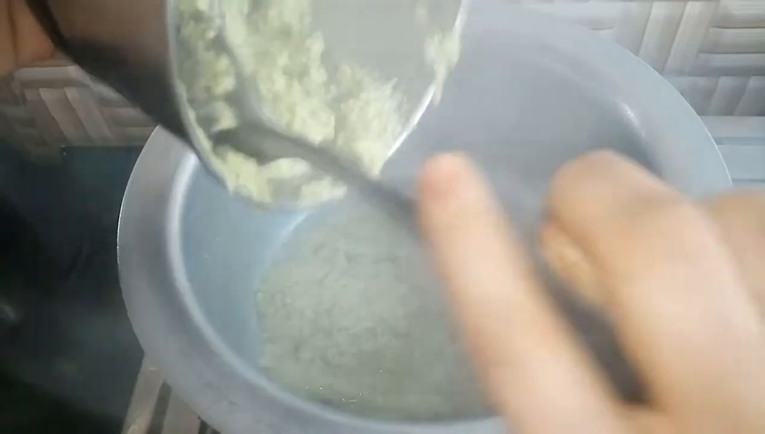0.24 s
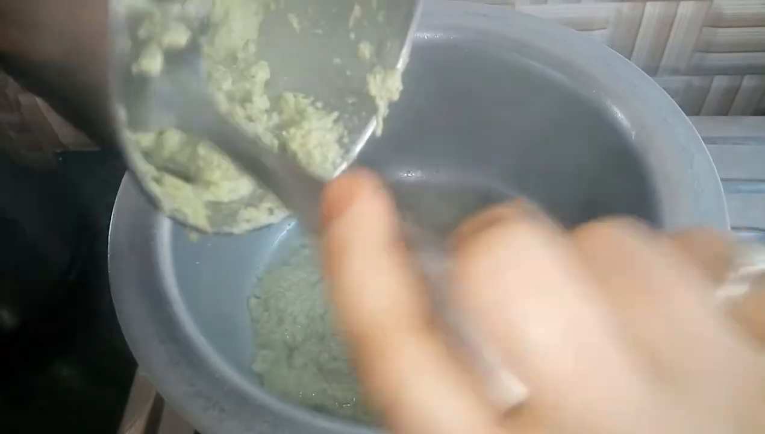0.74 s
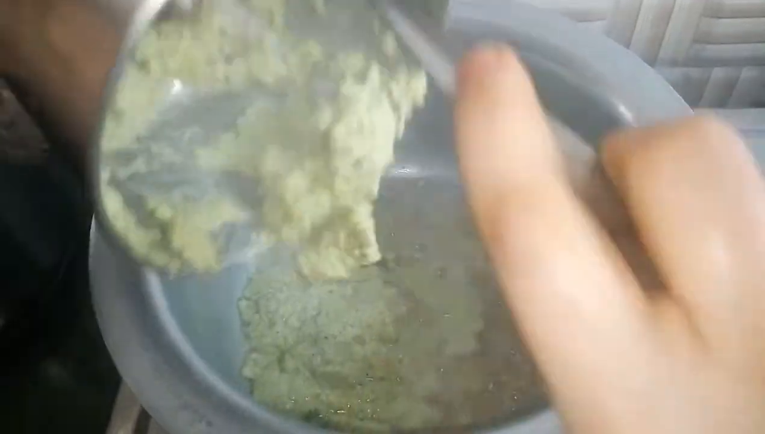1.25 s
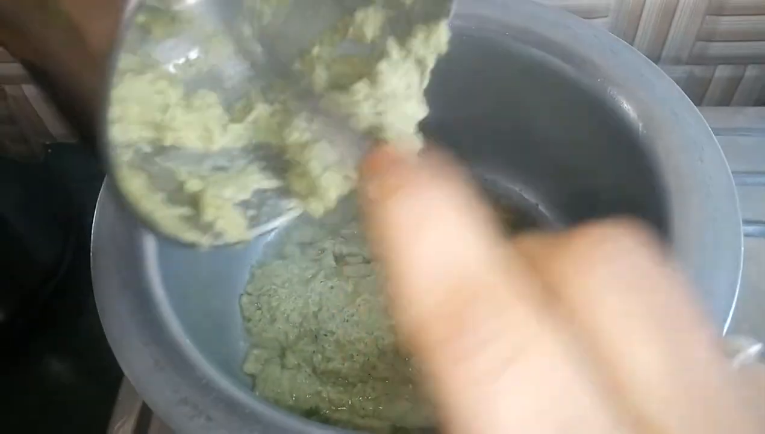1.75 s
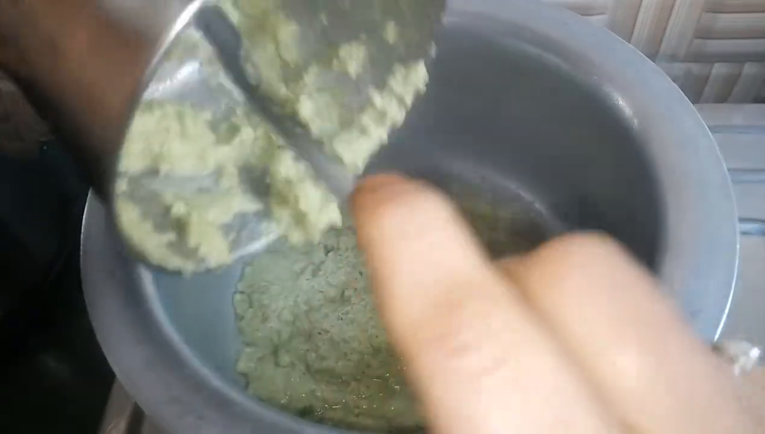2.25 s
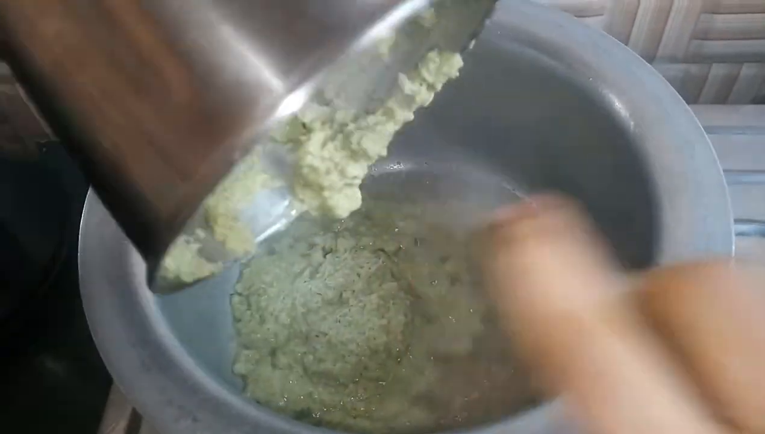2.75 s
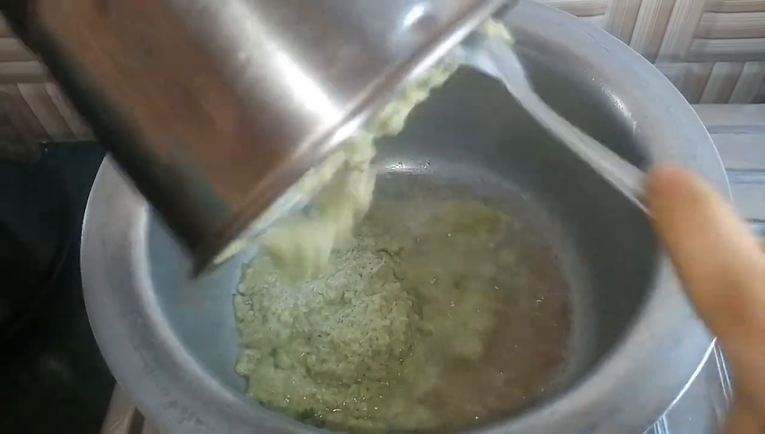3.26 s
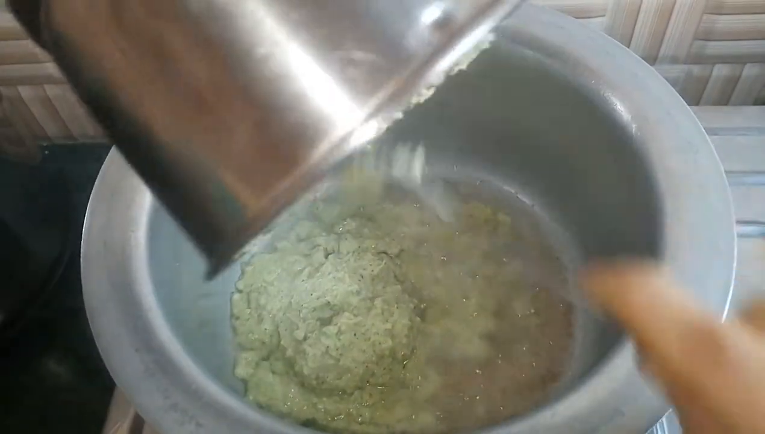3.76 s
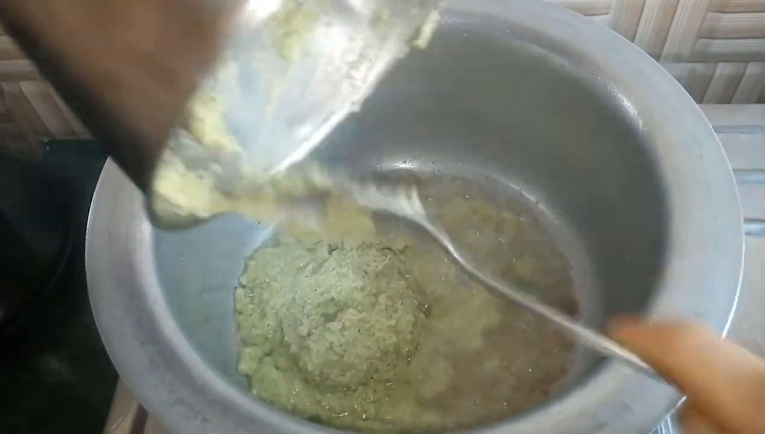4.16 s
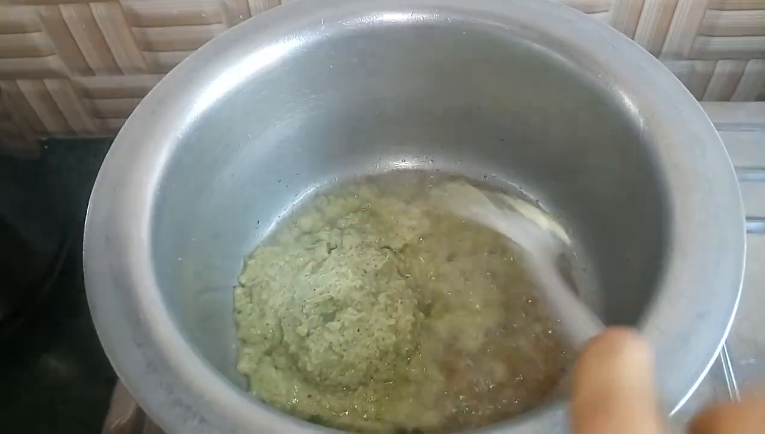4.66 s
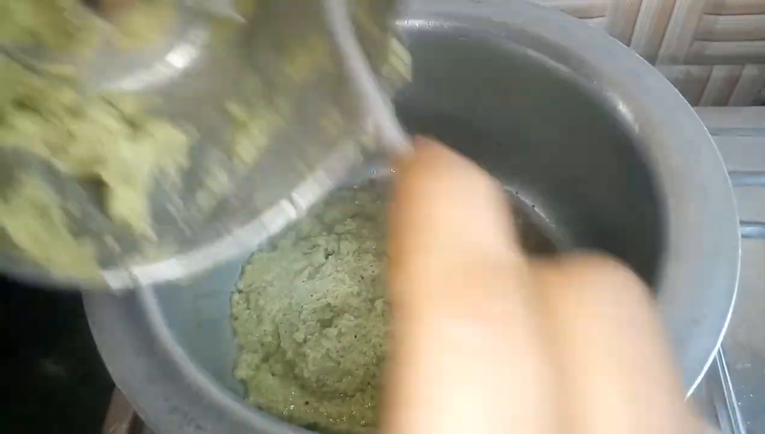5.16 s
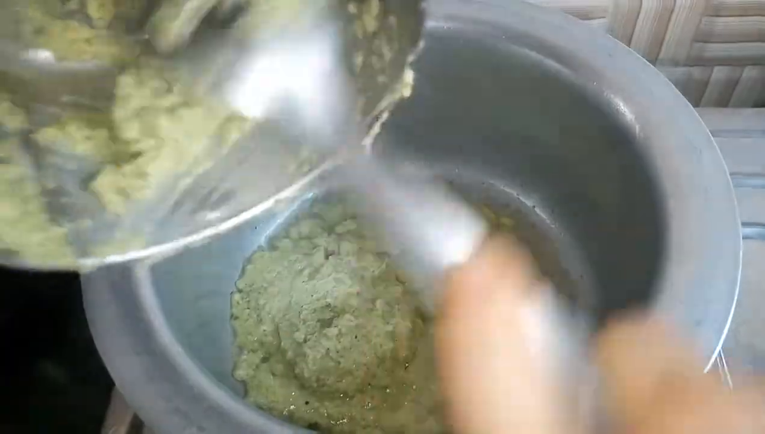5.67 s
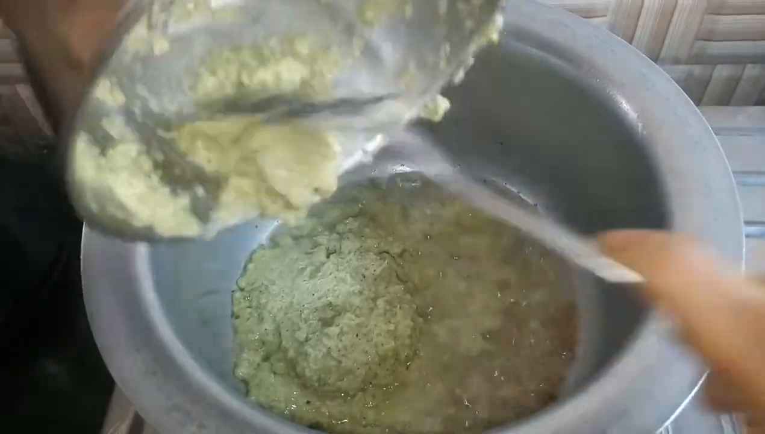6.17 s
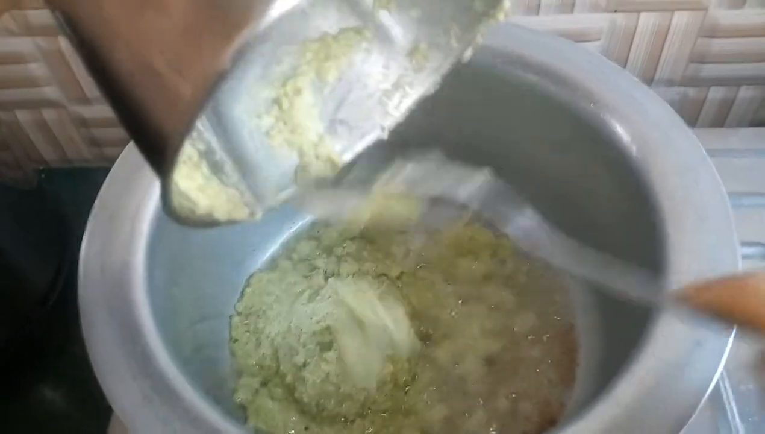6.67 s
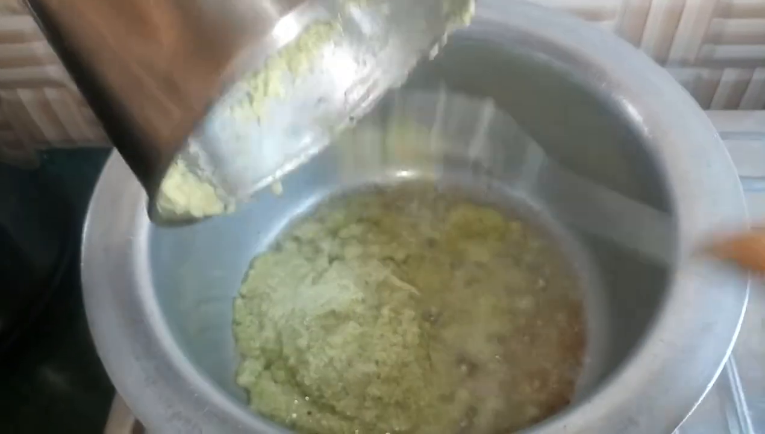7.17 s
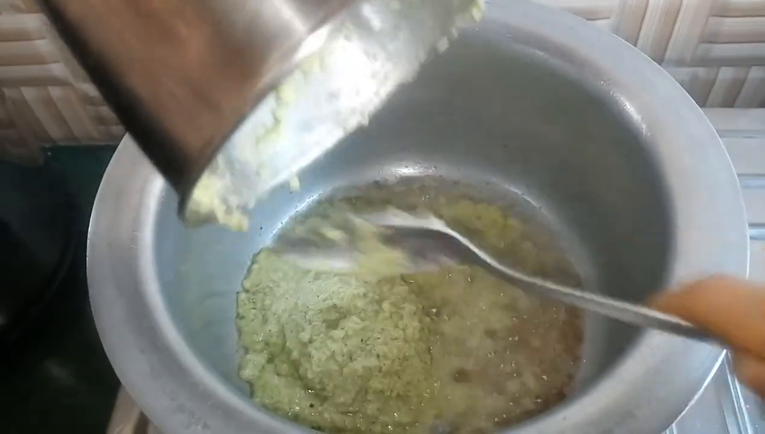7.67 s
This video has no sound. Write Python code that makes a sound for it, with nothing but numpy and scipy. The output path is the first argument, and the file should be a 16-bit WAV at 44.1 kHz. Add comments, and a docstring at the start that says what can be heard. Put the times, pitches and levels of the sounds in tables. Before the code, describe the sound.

Bright, crackling frying with ringing pops gradually dies down as a metal fork knocks and scrapes a steel jar close by in a kitchen.

```python
"""Spice paste frying in a pot

Wet spice paste sizzles in hot oil in an aluminium pot: crackle and noise in coloured bands, with ringing pops.
A fork knocks, clinks and scrapes on a steel jar: decaying modes, gritty noise and runs of ticks.
Soft low pushes bump near the microphone; a drone of resonant noise and a wavering hum swells in the kitchen.
A limiter holds down the sharpest peaks."""
import sys
import numpy as np
from scipy import signal
from scipy.fft import rfft, irfft, next_fast_len
from scipy.io import wavfile
from scipy.ndimage import uniform_filter1d, minimum_filter1d, map_coordinates

SR = 44100
rng = np.random.default_rng(int(sys.argv[2]) if len(sys.argv) > 2 else 0)


def digitize_waveform(pressure):
    """Quantize a signal to 16-bit integers and store it at the path in sys.argv[1].

    Rows of a 2-D input are taken as channels; values are limited to [-1, 1].
    """
    field = np.atleast_2d(pressure).T
    bounded = np.clip(field, -1, 1)
    quanta = np.round(bounded * 32767).astype(np.int16)
    wavfile.write(sys.argv[1], SR, quanta)


N = 349713

# decline of the frying: t/s, relative level/dB
BOIL = [(0, -18.5), (.8, -21.5), (1.6, -24), (2.6, -25.5), (4.7, -24.5), (6.3, -24.5), (6.6, -26.5),
        (7.93, -28.5)]
# loudest pops: t/s, relative level/dB, pitch/Hz
POPS = [(0.2079, 0, 3110), (0.466, -1, 4320), (0.5152, -7.5, 3800), (0.594, -8, 4030), (1.065, -3, 4000),
        (1.469, -4, 3880), (1.486, -8.5, 3700), (1.612, -11, 4800), (2.172, -3, 3250), (2.9153, -9, 3500),
        (3.441, -9.5, 3720), (3.5446, -1, 4240), (3.6875, -1, 4260), (4.026, -9, 3150), (4.1979, -3, 5300),
        (4.26, -7.5, 4040), (4.2705, 2, 4020), (4.9162, -0.5, 4090), (5.29, -5, 3020), (5.3216, -2, 4700),
        (5.8024, 1, 3940), (6.2323, -5, 3900), (6.278, -2, 4070), (7.294, -9, 3420)]


def amp(db):
    """Decibels to gain."""
    return 10 ** (np.asarray(db) / 20)


def unit(x):
    """Scale to rms 1."""
    return x / np.sqrt(np.mean(x ** 2) + 1e-20)


def noise():
    """White noise of rms near 1 for the whole scene."""
    return rng.standard_normal(N)


def decay(t, t60_s):
    """Exponential decay by 60 dB in t60_s."""
    return amp(-60 * t / t60_s)


def curves(rows):
    """One value per sample for each column after the time."""
    knot_s, *columns = np.transpose(rows)
    return [np.interp(np.arange(N) / SR, knot_s, c) for c in columns]


def swell(s, half_s):
    """Gaussian hump of height 1 at time s, down to 1/e half_s away."""
    return np.exp(-np.minimum(((np.arange(N) / SR - s) / half_s) ** 2, 20))


def wobble(rate):
    """Smooth random curve through rate knots a second."""
    steps = np.arange(0, N + 32, 32)
    knots = rng.standard_normal(int(N * rate / SR) + 4)
    smooth = map_coordinates(knots, [steps * rate / SR])
    return np.interp(np.arange(N), steps, smooth)


def filtered(x, response):
    """x times a response of frequency; the padding keeps tails from wrapping."""
    m = next_fast_len(len(x) + 8192)
    hz = np.fft.rfftfreq(m, 1 / SR)
    return irfft(rfft(x, m) * response(hz), m)[:len(x)]


def coloured(x, points):
    """x shaped by (f/Hz, gain/dB) points on a log frequency axis."""
    f, db = np.transpose(points)
    return filtered(x, lambda hz: amp(np.interp(np.log(hz + 1), np.log(f), db)))


def resonant(x, modes):
    """x through parallel resonances (f/Hz, stage bandwidth/Hz, gain/dB), each two equal stages in series."""
    def response(f):
        return sum(amp(db) * (1j * f * w / (c * c - f * f + 1j * f * w)) ** 2 for c, w, db in modes)
    return filtered(x, response)


def narrow(centre_hz, half_width_hz):
    """Noise of rms 1 in a narrow band whose centre may move: slow noise on a carrier."""
    lowpass = signal.butter(2, half_width_hz, fs=SR, output="sos")
    slow = signal.sosfilt(lowpass, rng.standard_normal((2, N)))
    phase = 2 * np.pi * np.cumsum(centre_hz * np.ones(N)) / SR
    return unit(slow[0] * np.cos(phase) + slow[1] * np.sin(phase))


def add(track, s, sound):
    """Mix a sound into the track at time s."""
    place = track[max(round(s * SR), 0):][:len(sound)]
    place += sound[:len(place)]


def crackle(count, size_db):
    """Random-sign ticks of rms 1 overall, count a second: most are faint, a few stand out."""
    total = count * N // SR
    size = amp(size_db * np.minimum(rng.exponential(size=total), 4))
    sign = rng.choice([-1, 1], total)
    return unit(np.bincount(rng.integers(N, size=total), size * sign, N))


def echoes(x, t60, wet_db):
    """x and its dense reflections, as convolution with decaying noise."""
    t = np.arange(SR // 3) / SR
    tail = rng.standard_normal(len(t)) * decay(t, t60) * (t > .001)
    return x + amp(wet_db) * signal.fftconvolve(x, tail / np.linalg.norm(tail))[:N]


def frying():
    """Relative levels/dB of coarse bubbles, fine bubbles and spray: a slow decline, flares and one dip."""
    # wet paste meets fresh oil: peak t/s, half length/s, coarse rise/dB, fine rise/dB
    flares = [(1.23, .12, 1.37, 2.5), (1.981, .12, 2, 5), (2.333, .1, 1, 3), (2.921, .1, 2.5, 4.5),
              (3.683, .17, 4.5, 4.5), (4.199, .11, 2.5, 3), (5.47, .16, 3, -1.5), (6.27, .1, 1.5, -1),
              (7.271, .14, 1.5, 1)]
    # fine spray: t/s, level/dB
    mist = [(0, -47), (1.3, -49.5), (2.8, -51.6), (3.8, -50.5), (5.1, -49), (6.3, -53.5), (7.93, -54)]
    fine_db, fine_db_per_s = -4.5, 0.41  # against coarse; fine bubbles gain as the paste dries
    dip_db = -7 * swell(6.91, half_s=.16)  # brief dip around the bumps
    coarse = curves(BOIL)[0] + dip_db
    fine = coarse + fine_db + fine_db_per_s * np.arange(N) / SR
    for s, half_s, coarse_rise_db, fine_rise_db in flares:
        hump = swell(s, half_s)
        coarse = coarse + coarse_rise_db * hump
        fine = fine + fine_rise_db * hump
    return coarse, fine, curves(mist)[0] + dip_db


def sizzle(coarse_db, fine_db, spray_db):
    """Steam bursts through the oil as crackle on a hiss, and throws a fine spray."""
    # filters of coarse bubbles, fine bubbles and spray: f/Hz, gain/dB
    coarse_colour = [(200, -49), (500, -29), (1300, -28.5), (2050, -23.5), (2330, -11), (2570, -5),
                     (2780, -4), (3100, 1.5), (3550, -2), (4000, 0.5), (4500, -2.5), (5500, -26),
                     (8000, -45.5)]
    fine_colour = [(2500, -35.5), (3900, -21.5), (4600, -2), (5200, 1.5), (5700, -1), (6300, -2.5),
                   (7300, -11), (8100, -23.5), (15500, -55)]
    spray_colour = [(5000, -50), (7000, -5), (8500, -2.5), (10000, -4.5), (11500, -5), (13000, -12),
                    (15500, -37)]
    # shared level flutter at three rates
    sputter_db = 1.0 * wobble(280) + 1.15 * wobble(80) + .6 * wobble(14)
    ticks = crackle(count=2200, size_db=4.3)
    coarse = unit(coloured(ticks + amp(-1) * noise(), coarse_colour))
    coarse = amp(coarse_db - 1.68 + sputter_db) * coarse
    fine = unit(coloured(ticks + amp(4.5) * noise(), fine_colour))
    fine = amp(fine_db - 1.93 + 1.05 * sputter_db) * fine
    spray = unit(coloured(crackle(count=2500, size_db=3) + amp(1) * noise(), spray_colour))
    spray = amp(spray_db + 0.28 * sputter_db + 0.68 * wobble(12)) * spray
    return shifting(coarse + fine, depth_db=2.1) + spray


def shifting(x, depth_db):
    """Reflections between pot, jar and hand drift: smoothed random gains make narrow bands swell and fade."""
    z = signal.stft(x, nperseg=512)[2]
    field = uniform_filter1d(rng.standard_normal(z.shape), size=2, axis=0)  # across frequency
    field = uniform_filter1d(field, size=16, axis=1)  # across time
    return signal.istft(z * amp(depth_db * unit(field)), nperseg=512)[1][:N]


def pops(level_db):
    """Larger pockets of steam burst with a short ring and a spit of oil."""
    rows = np.vstack([POPS, small_pops(level_db)])
    s, db, pitch_hz = rows.T
    cycles = 1.8 * np.exp(.15 * rng.standard_normal(len(s)))
    ring = bursts(s + .0008, pitch_hz, amp(db + 2), cycles)
    spit, t = np.zeros(N), np.arange(SR // 25) / SR
    for start_s, level, _ in rows:
        add(spit, start_s, amp(level - 6) * decay(t, .018) * rng.standard_normal(len(t)))
    burst = coloured(ring + spit, [(1000, -36), (2000, -20), (2700, -0.5), (5500, 2.0),
                                   (7000, -7.5), (8200, -48), (15000, -50)])
    return echoes(burst, t60=.035, wet_db=-11)


def small_pops(level_db):
    """Rows like POPS: chance pops that follow the frying level, and one weaker pop soon after each loud one."""
    count, over_frying_db, spread_db = 110, 12, 0.5
    median_hz, spread_octaves = 4150, 0.26
    chain_s, chain_loss_db = .035, 10  # longest delay and drop of the pop set off by a loud one
    odds = np.cumsum(amp(level_db))
    draws = (np.arange(count) + rng.random(count)) / count
    at = np.searchsorted(odds, odds[-1] * draws)
    loud_s, loud_db, _ = np.transpose(POPS)
    s = np.concatenate([at / SR, loud_s + chain_s * rng.random(len(POPS))])
    db = np.concatenate([level_db[at] + over_frying_db, loud_db - chain_loss_db])
    size, pitch = np.clip(rng.standard_normal((len(s), 2)), -2, 2).T
    return np.column_stack([s, db + spread_db * size, median_hz * 2 ** (spread_octaves * pitch)])


def bursts(times, pitch_hz, size, cycles):
    """Each bubble rings for a few cycles, swelling quickly and dying away."""
    n = np.arange(220)
    turns = pitch_hz[:, None] * n / SR
    age = turns / cycles[:, None]
    envelope = size[:, None] * age * np.exp(1 - age)
    waves = envelope * np.sin(2 * np.pi * (turns + rng.random((len(times), 1))))
    at = (times * SR).astype(int)[:, None] + n
    return np.bincount(at.ravel(), waves.ravel(), N)[:N]


def pot():
    """The frying keeps the air in the pot ringing with hollow tones: narrow noise bands of wavering level."""
    # upper tone, retuned as the jar moves over the pot: t/s, f/Hz, level against BOIL/dB
    upper_tone = [(0, 1695, -26), (1.6, 1560, -22.5), (3.9, 1588, -23), (4.5, 1512, -20),
                  (5.3, 1526, -22.5), (6.2, 1597, -25.5), (7.93, 1578, -20)]
    # fixed tones: f/Hz, half-width/Hz, level/dB
    fixed_tones = [(690, 18, -54.5), (718, 81, -52), (1068, 54, -58.5), (1963, 13, -60)]
    upper_hz, share_db = curves(upper_tone)
    steady = sum(amp(db) * narrow(hz, half_width) for hz, half_width, db in fixed_tones)
    steady = amp(2.8 * wobble(12)) * steady
    upper_db = curves(BOIL)[0] + share_db + 1.34 * wobble(12)
    return steady + amp(upper_db) * narrow(upper_hz, half_width_hz=137)


def fork():
    """The fork knocks the jar's wall, and clinks and scrapes where steel meets bare steel."""
    # knocks on the jar: t/s, relative level/dB, favoured pitch/Hz
    knocks = [(.387, -23.5, 1220), (.925, -29, 1130), (1.064, -26.5, 1040), (1.487, -30, 1010),
              (1.618, -20, 980), (1.772, -25.5, 1040), (2.149, -25.5, 1110), (2.283, -22.5, 1040),
              (2.618, -22.5, 950), (2.73, -24.5, 1320), (3.097, -22.5, 1220), (3.113, -22.5, 970),
              (3.36, -17.5, 1290), (4.069, -30, 1130), (5.297, -12, 1080), (5.449, -21, 1050),
              (5.817, -4, 985), (6.076, -18.5, 1140), (6.375, -18, 1850), (6.945, -15.5, 1610)]
    # jar modes, damped by paste and hand: f/Hz, level/dB, t60/s
    jar_modes = [(696, -7, 0.15), (958, 3, 0.085), (993, -1, 0.29), (1071, -2, 0.2), (1136, -2.5, 0.13),
                 (1200, -4, 0.092), (1328, -2.5, 0.079), (1503, 1, 0.062), (1606, -0.5, 0.13),
                 (1785, -5, 0.09), (1946, -5, 0.16), (2350, -1, .1), (2610, 14, 0.13), (3120, 3, .08),
                 (4000, 10, .1)]
    # bright contacts: t/s, relative level/dB, favoured pitch/Hz, scrape t60/s, relative clatter level/dB
    clinks = [(2.148, -10.5, 7000, 0.024, -33.5), (2.28, -7, 5000, 0.12, -11.5),
              (2.617, -7.5, 5070, 0.033, -28), (3.108, -17, 3000, 0.055, -11), (3.361, -12, 2600, .03, -18),
              (4.067, -1, 5200, 0.0091, -44), (5.297, -10, 2575, 0.0083, -15), (5.45, -4, 4930, 0.061, -25),
              (5.736, -11.5, 11500, .012, -27), (5.8163, 2.5, 4050, 0.015, -28),
              (5.824, -8.5, 7000, .03, -21), (6.076, -11, 4000, 0.066, -15), (6.377, -7, 3120, 0.065, -21),
              (6.944, -11.5, 4440, 0.034, -22)]
    # fork modes: f/Hz, level/dB, t60/s
    fork_modes = [(2553, 15.5, 0.015), (3990, 3, 0.056), (4960, 7.5, 0.01), (6380, 5.5, 0.021),
                  (6800, -11, .03), (7380, 3.5, 0.014), (9040, -13, 0.013), (11260, -15, 0.018)]
    wall, tines, t = np.zeros(N), np.zeros(N), np.arange(SR // 4) / SR
    # 14 light taps while the fork digs in the paste
    taps = [(s, -33, 800) for s in rng.uniform(1, 2.2, 14)]
    for s, db, favoured_hz in list(knocks) + taps:
        add(wall, s, amp(db) * struck(jar_modes, favoured_hz, octaves=0.17, attack_s=.0005))
    for s, db, favoured_hz, scrape_t60_s, clatter_db in clinks:
        grit = unit(coloured(rng.standard_normal(len(t)), [(800, -42), (1800, -19), (2600, 8.5),
                                                           (6500, 6), (8500, -13), (15000, -34)]))
        clatter = unit(coloured(rng.standard_normal(len(t)), [(100, -24), (330, -1.5), (1000, -0.5),
                                                              (2000, 3.0), (4000, -39)]))
        add(tines, s, amp(db + 3) * struck(fork_modes, favoured_hz, octaves=.4, attack_s=.0003))
        add(tines, s, amp(db - 10) * decay(t, scrape_t60_s) * grit)
        add(wall, s, amp(db + clatter_db - 11.5) * decay(t, 0.34) * clatter)
    tines = coloured(tines, [(500, -28), (1500, 14.5), (2300, 1)])  # thin steel radiates no bass
    return echoes(wall, t60=.36, wet_db=-10) + echoes(tines, t60=0.24, wet_db=-10.5)


def struck(modes, favoured_hz, octaves, attack_s):
    """Sum of decaying modes; the point of contact favours those near one pitch."""
    t = np.arange(SR // 4) / SR
    hz, db, t60 = np.transpose(modes)[:, :, None]
    nearness = 1 / (1 + (np.log2(hz / favoured_hz) / octaves) ** 2)
    level, detune, phase = rng.standard_normal((3, len(modes), 1))
    strength = nearness * amp(db + 0.92 * level)
    tone = np.sin(2 * np.pi * hz * (1 + .003 * detune) * t + np.pi * phase)
    ring = (strength * decay(t, t60) * tone).sum(0)
    return ring * (1 - np.exp(-t / attack_s)) * amp(-3.0) / np.linalg.norm(strength)


def scrapes():
    """The tines catch and slip on the jar's wall: a gritty run of tiny ticks through steel resonances."""
    # drags over bare steel: peak t/s, half length/s, level/dB
    drags = [(4.144, 0.031, -26), (5.402, .035, -24.5), (6.07, 0.013, -26), (7.168, 0.044, -23.5)]
    # steel resonances: f/Hz, stage bandwidth/Hz, gain/dB
    steel_tones = [(1680, 570, -17.5), (3900, 500, -1), (4750, 310, -8), (5720, 340, 1.5)]
    pressure = sum(amp(db) * swell(s, half_s) for s, half_s, db in drags)
    return pressure * unit(resonant(crackle(count=1500, size_db=11.5), steel_tones))


def bumps():
    """Each bump is one low push of air and its rebound, with a short dull rub."""
    # bumps near the microphone: t/s, relative level/dB, push time constant/s, upper band edge/Hz
    pushes = [(6.72, -28, 0.0015, 500), (6.742, -21.5, 0.0012, 497), (6.761, -17.5, 0.0013, 550),
              (6.785, -17, 0.0015, 900), (6.8205, -16.5, 0.0018, 1300), (6.8565, -13, 0.0014, 1580),
              (6.8614, -20.5, 0.0046, 250), (6.87, -18.5, 0.00064, 1390)]
    track, t = np.zeros(N), np.arange(SR // 15) / SR
    for s, db, length_s, dull_hz in pushes:
        push = (1 - t / length_s) * np.exp(-t / length_s)
        low_hz = min(0.17 / length_s, dull_hz / 2)
        band = signal.butter(2, [low_hz, dull_hz], "bandpass", fs=SR, output="sos")
        rub = unit(coloured(rng.standard_normal(len(t)), [(80, -20), (190, 4), (450, 0),
                                                          (900, -8), (3000, -52)]))
        rub_envelope = decay(t, 0.1) * (1 - np.exp(-t / 0.0038))
        add(track, s, amp(db + 4.0) * signal.sosfilt(band, push))
        add(track, s - .005, amp(db - 14.5) * rub_envelope * rub)
    return track


def drone():
    """Low resonant noise that rises and swells, with a wavering hum that sets in with it."""
    # rumble tones: f/Hz, half stage bandwidth/Hz, gain/dB
    rumble_tones = [(79.5, 5.6, 3.5), (115.5, 19, -6)]
    # swells: peak t/s, half length/s, rumble rise/dB, hum rise/dB
    swells = [(3.25, 0.45, 5, 13.5), (3.9, 0.18, 12.5, 11), (4.703, 0.22, 10, -1), (5.15, 0.11, 10, 3),
              (5.77, .1, 5, 13), (6.45, .28, 5, 10.5), (7.55, 0.14, 6, 4)]
    start_s, rise_s, off_db, on_db = 2.7, .3, -63, -55.5
    hum_hz, hum_base_db = 56.7, -59.5
    on = np.clip((np.arange(N) / SR - start_s) / rise_s, 0, 1)
    rumble_db = off_db + on * (on_db - off_db)
    rumble_db = rumble_db + sum(db * swell(s, half_s) for s, half_s, db, _ in swells)
    hum_db = hum_base_db + sum(db * swell(s, half_s) for s, half_s, _, db in swells)
    phase = 2 * np.pi * np.cumsum(hum_hz + wobble(5.6)) / SR
    hum = on * amp(hum_db + 2.4 * wobble(7)) * np.sin(phase)
    tones = resonant(noise(), [(hz, 2 * half, db) for hz, half, db in rumble_tones])
    rumble = unit(coloured(tones, [(36, -16), (52, -0.5), (200, -1.0), (500, -12)]))
    return amp(rumble_db) * rumble + hum


def kitchen():
    """Quiet room noise: a steady coloured bed and a wavering hollow part through room resonances."""
    # bed filter: f/Hz, gain/dB
    bed_colour = [(20, -13), (60, 2), (120, -3), (250, -6), (500, -3.5), (900, 5), (3000, -61)]
    # room resonances: f/Hz, stage bandwidth/Hz, gain/dB
    room_modes = [(227.6, 33, -2.5), (336.3, 26, 5), (482, 46, 3.5)]
    hollow = amp(-64.0 + 2.0 * wobble(5)) * unit(resonant(noise(), room_modes))
    return hollow + amp(-53) * unit(coloured(noise(), bed_colour))


def scene():
    """Everything heard from just above the pot."""
    coarse_db, fine_db, spray_db = frying()
    food = sizzle(coarse_db, fine_db, spray_db) + pops(coarse_db) + pot()
    handling = fork() + scrapes() + bumps()
    return (food + handling + drone() + kitchen())[None]


def record(dry):
    """A fast limiter holds down the highest peaks; nothing is kept above the band limit."""
    ceiling, top_hz = .78, 15700
    needed = np.minimum(1, ceiling / (np.abs(dry[0]) + 1e-9))
    gain = uniform_filter1d(minimum_filter1d(needed, size=90), size=60)
    return filtered(dry[0] * gain, lambda hz: hz < top_hz)[None]


dry = scene()
out = record(dry)
digitize_waveform(out)
```